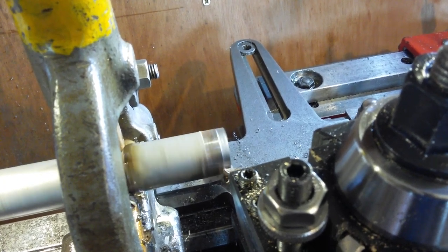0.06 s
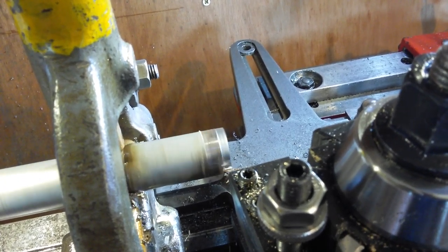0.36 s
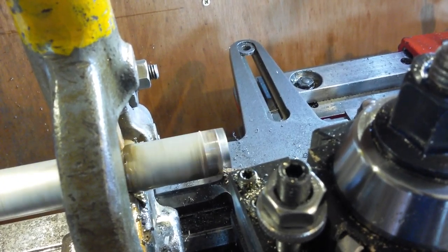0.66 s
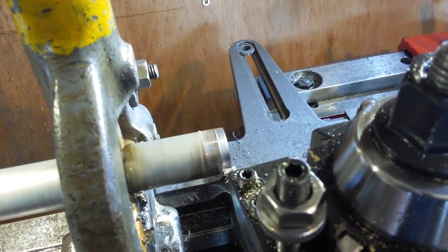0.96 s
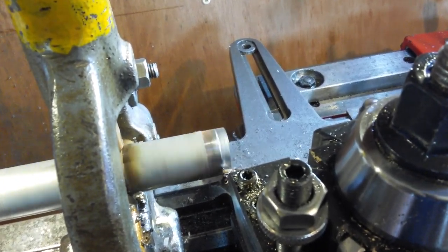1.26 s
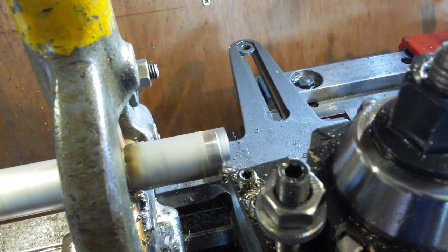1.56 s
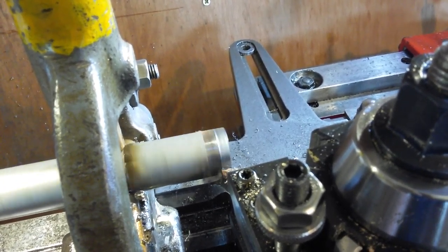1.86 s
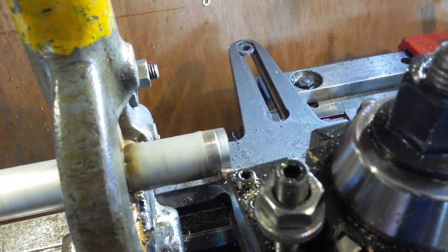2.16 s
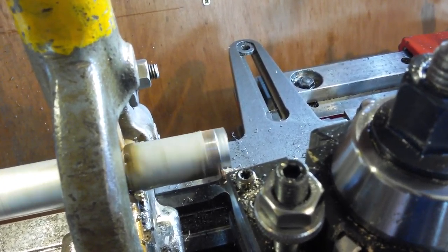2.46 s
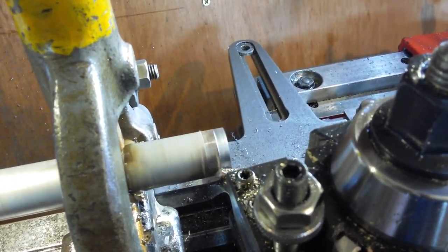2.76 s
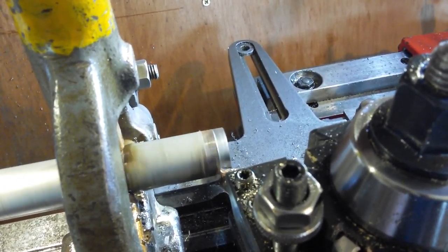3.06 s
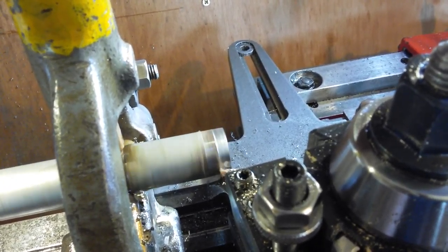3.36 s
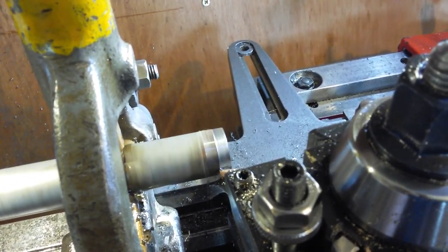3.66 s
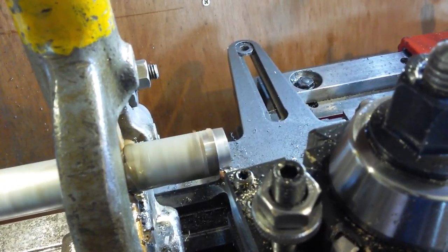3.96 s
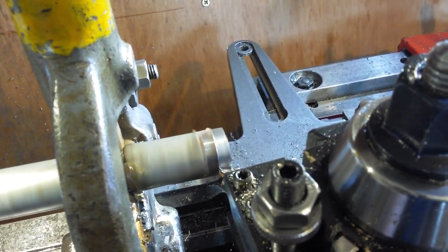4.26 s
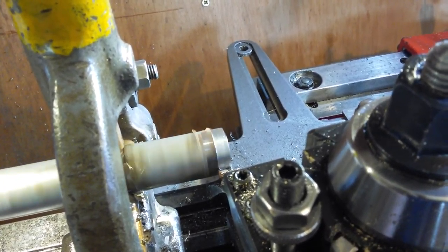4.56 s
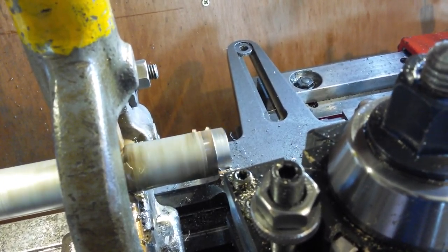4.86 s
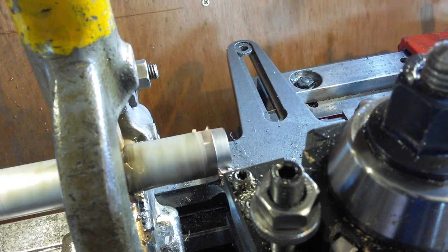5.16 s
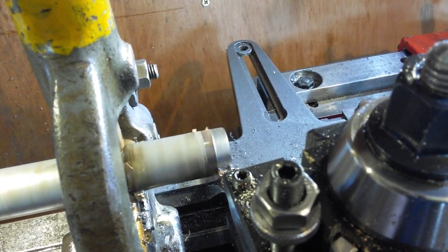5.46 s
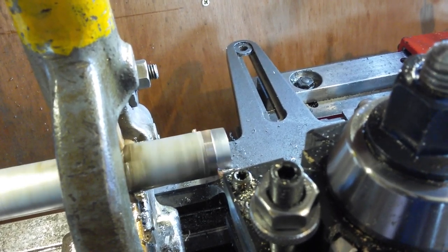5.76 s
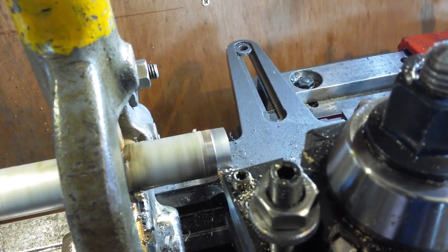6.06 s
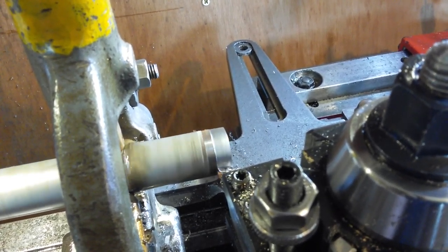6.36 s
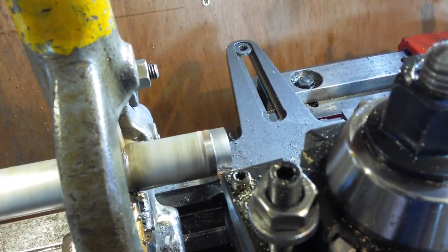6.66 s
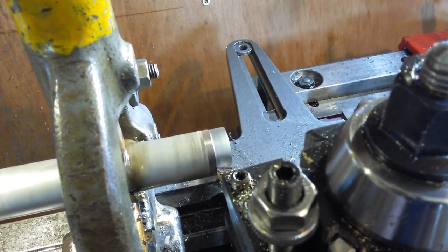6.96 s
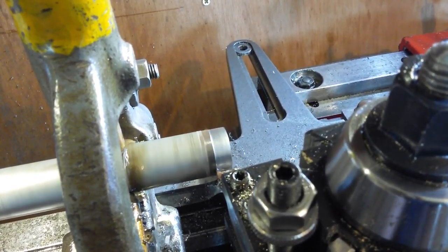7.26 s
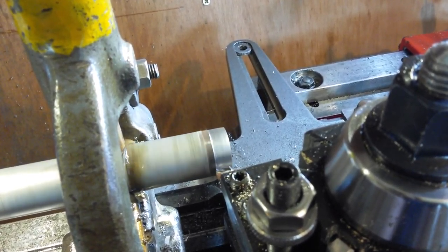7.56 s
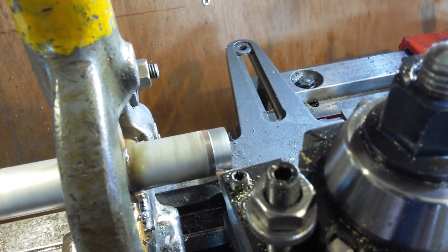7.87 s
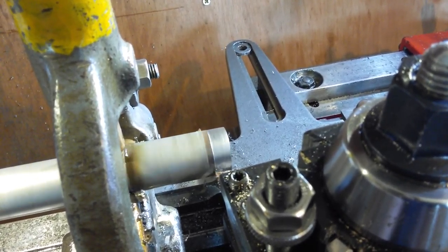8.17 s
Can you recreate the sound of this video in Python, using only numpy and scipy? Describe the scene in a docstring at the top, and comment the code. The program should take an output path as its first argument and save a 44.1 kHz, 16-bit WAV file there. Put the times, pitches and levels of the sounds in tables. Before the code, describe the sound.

A lathe tool squeals close by as it turns a metal tube in a small workshop. The high, wavering squeal comes in short bursts from start to finish, some mere chirps, stalling briefly as the tool digs in on each turn. The early digs add little low squawks. Chips scrape and crackle with the cut, while to the right a motor hums faintly, gears rattle and a belt slaps softly now and then.

```python
"""A lathe tool squeals near 2 kHz in bursts, close by, as it turns a metal tube in a home workshop.
The tool chatters at its own resonance and strikes the work each cycle, adding overtones.
Once a turn it digs in: the pitch sags, the squeal stalls, and deep digs squawk.
The chip scrapes and crackles; to the right the motor hums, gears rattle and a belt slaps."""
import sys
import numpy as np
from scipy import signal
from scipy.fft import rfft, irfft
from scipy.io import wavfile
from scipy.ndimage import uniform_filter1d

SR = 44100
rng = np.random.default_rng(int(sys.argv[2]) if len(sys.argv) > 2 else 0)


def output_pcm(signal):
    """Save a mono or channel-first signal as 16-bit PCM at the path in sys.argv[1].

    Samples are clipped to [-1, 1] before scaling.
    """
    pcm = np.clip(np.atleast_2d(signal).T, -1, 1) * 32767
    wavfile.write(sys.argv[1], SR, np.round(pcm).astype(np.int16))


N = 371763
T = np.arange(N) / SR
BINS_HZ = np.fft.rfftfreq(N, 1 / SR)


def undb(db):
    """Decibels to gain."""
    return 10 ** (np.asarray(db) / 20)


def unit(x):
    """Scale to rms 1."""
    return x / np.sqrt(np.mean(x ** 2))


def pan(db):
    """Stereo gains for a left-minus-right level."""
    return unit(undb(np.array([[db], [-db]]) / 2))


def curve(points):
    """Interpolate (time_s, value) rows at every sample."""
    return np.interp(T, *np.transpose(points))


def colour(x, points):
    """Filter by a smooth (freq_hz, gain_db) spectrum."""
    hz, db = np.transpose(points)
    return irfft(rfft(x) * undb(np.interp(np.log(BINS_HZ + 1), np.log(hz), db)), N)


def ring(x, modes):
    """Steep resonances, each four stages of the given width in series."""
    gain = sum(undb(db) / (1 + 1j * (BINS_HZ ** 2 - hz ** 2) / (2 * width_hz * (BINS_HZ + 1))) ** 4
               for hz, width_hz, db in modes)
    return irfft(rfft(x) * gain, N)


def walk(rate_hz):
    """Smooth random drift, rms 1."""
    step = max(int(SR / rate_hz), 1)
    held = np.repeat(rng.standard_normal(N // step + 1), step)
    return unit(uniform_filter1d(held, step)[:N])


# nearest reflection off the machine, left then right: delay_s, gain
BOUNCE = [(.00543, .4), (.00365, .6)]

def workshop(x, early_db, early_s, late_db, t60_s):
    """Direct sound, a bounce, dense echoes from the machine and a short room tail."""
    t = T[:SR // 2]
    out = []
    for side, (delay_s, gain) in zip(np.broadcast_to(x, (2, N)), BOUNCE):
        early, late = rng.standard_normal((2, len(t)))
        early = unit(early * np.exp(-t / early_s)) * undb(early_db)
        late = unit(late * undb(-60 * t / t60_s) * np.minimum(t / 0.011, 1)) * undb(late_db)
        response = (early + late) / np.sqrt(len(t))
        response[0] += 1
        response[int(delay_s * SR)] += gain
        out.append(unit(signal.fftconvolve(side, response)[:N]) * np.std(side))
    return np.array(out)


# spindle speed: time_s, turns_per_s
SPINDLE_SPEED = [(0, 6.61), (2.95, 6.585), (3.25, 6.25), (3.6, 6.53), (6.7, 6.52), (8.43, 6.66)]

def spindle(dig_at_s, lead_s, lag_s):
    """The tool digs in once a turn. Returns work angle, time since the dig and dig strength (0-1)."""
    speed = curve(SPINDLE_SPEED)
    turns = np.cumsum(speed) / SR
    turns -= np.interp(dig_at_s, T, turns)
    from_dig_s = (turns - np.round(turns)) / speed
    dig = np.exp(-(from_dig_s / np.where(from_dig_s < 0, lead_s, lag_s)) ** 2)
    return turns % 1, turns % 1 / speed, dig


# spells of chatter: start_s, end_s, force_db
SQUEALS = [(0, .19, -1), (.249, 0.499, 0), (0.541, 0.759, 1), (0.82, 1.052, -1), (1.174, 1.35, -1),
           (1.453, 1.741, 0), (1.801, 2.097, 1), (2.187, 2.344, -1), (2.464, 2.47, 1), (2.51, 2.617, 1),
           (2.641, 2.677, 1.5), (2.725, 2.735, -6.5), (2.783, 2.923, 0.5), (3.028, 3.075, -2),
           (3.094, 3.187, 2.5), (3.248, 3.35, -0.5), (3.386, 3.503, -3.5), (3.538, 3.546, 3),
           (3.687, 3.695, -0.5), (3.722, 3.877, 0.5), (3.99, 4.005, 0), (4.045, 4.138, 1.5),
           (4.174, 4.198, 3.5), (4.29, 4.436, 1.5), (4.546, 4.734, .5), (4.835, 4.989, 1),
           (5.037, 5.046, -5), (5.137, 5.295, 1), (5.343, 5.349, -8), (5.427, 5.603, 0), (5.731, 5.914, 0),
           (6.049, 6.264, 1), (6.309, 6.446, -.5), (6.624, 6.767, -0.5), (6.874, 6.877, -8),
           (6.906, 6.992, -0.5), (7.121, 7.14, -2), (7.162, 7.288, .5), (7.329, 7.335, -2),
           (7.389, 7.505, 0), (7.651, 7.654, -13), (7.688, 7.756, -1.5), (7.823, 7.842, -4.5),
           (7.897, 7.98, -0.5), (8.013, 8.279, -0.5), (8.331, 8.47, -.5)]
# pitch drop at the peak of a dig: time_s, sag_hz
DIG_SAG = [(0, 420), (2.8, 330), (4.5, 230), (8.4, 160)]
GRAB_DB, GRAB_S, BUILD_S = 2.2, 0.016, 0.1
STALL_S_PER_HZ, STALL_ONSET_HZ = 0.000102, 115

def bursts(level_db, since_dig_s, rise_s, fall_s, tail_db, tail_s, idle_db, flutter_db):
    """Squeal envelope: overshoots as the tool grabs, holds, rings out; a weak tremor in between."""
    envelope = np.zeros(N)
    for (start_s, end_s, _), db in zip(SQUEALS, level_db):
        span = slice(int(start_s * SR), int((end_s + 0.3) * SR))
        age_s, after_s = np.maximum(T[span] - start_s, 0), np.maximum(T[span] - end_s, 0)
        # longer squeals build up more ringing in the tube
        built_up = 1 - np.exp(-(end_s - start_s) / BUILD_S)
        tail = undb(tail_db) * built_up * np.exp(-after_s / tail_s)
        gate = np.minimum(age_s / rise_s, 1) * np.maximum(np.exp(-after_s / fall_s), tail)
        envelope[span] = np.maximum(envelope[span], gate * undb(db + GRAB_DB * np.exp(-age_s / GRAB_S)))
    # deeper digs stall the chatter for longer
    stall_s = STALL_S_PER_HZ * (curve(DIG_SAG) - STALL_ONSET_HZ)
    recovery = np.clip((since_dig_s - stall_s) / rise_s, 0, 1)
    envelope *= np.maximum(np.exp(-since_dig_s / fall_s), recovery)
    return np.maximum(envelope, undb(idle_db + flutter_db * walk(60)))


# partials 2 and up: left_db, right_db
OVERTONES = [(-3.5, -14), (-6.5, -1), (-12, -14), (-0.5, -14.5), (-8, -11.5), (-22.5, -20), (-31, -29)]
# radiation of tube and tool: freq_hz, gain_db
RADIATION = [(1000, -36), (1950, 0.5), (2800, -13), (3550, -4), (4200, 8.5), (4750, -16.5), (5350, -35),
             (6100, 16), (6650, -9), (8100, -2.5), (10100, -9), (12000, -3.5), (13000, -18), (14000, -7),
             (15000, -28)]
# tube's response to partial 3 as the tool travels: time_s, gain_db
THIRD_PARTIAL = [(0, -1.5), (1.7, 1), (3, 0), (5.5, -0.5), (6.9, -7), (8.4, -1)]
CHATTER_HZ, BRIGHT_DB_PER_HZ = 2025.6, 0.016
RUNOUT_HZ, RUNOUT_PEAK_TURNS, LOBE_HZ, LOBE_PEAK_TURNS = 23.76, 0.77, 31.1, 0.4016

def chatter(angle_turns, dig, swing, bite):
    """The tool swings at its resonance and strikes the work each cycle, which adds the overtones."""
    # the work runs off centre and is slightly three-lobed
    bend_hz = RUNOUT_HZ * np.cos(2 * np.pi * (angle_turns - RUNOUT_PEAK_TURNS))
    bend_hz += LOBE_HZ * np.cos(6 * np.pi * (angle_turns - LOBE_PEAK_TURNS))
    sag_hz = dig * curve(DIG_SAG)
    # chip load bends the pitch; tearing jostles it, most in a dig
    waver_hz = 14 * walk(30) + 21 * walk(80) + (9 * walk(300) + 11 * walk(1600)) * (1 + 2.5 * dig)
    phase = 2 * np.pi * np.cumsum(CHATTER_HZ + bend_hz - sag_hz + waver_hz) / SR
    # the cut grabs and slips
    throb = 1 + 0.29 * np.sin(2 * np.pi * np.cumsum(55 + 22 * walk(25)) / SR)
    stall_db = -0.04 * sag_hz
    tone = np.sqrt(2) * np.sin(phase) * swing * throb * undb(0.96 * walk(120) + stall_db + 1.44)
    strike = bite * undb(BRIGHT_DB_PER_HZ * bend_hz + 2.87 * walk(100) + stall_db / 2 - 4)
    overtones = 0
    for k, sides_db in enumerate(OVERTONES, 2):
        partial = np.sin(k * (phase + 0.065 * walk(900))) * undb(2.6 * walk(140))
        partial = unit(colour(partial, RADIATION))
        if k == 3:
            partial *= undb(curve(THIRD_PARTIAL))
        overtones += undb(sides_db)[:, None] * partial * strike
    return (workshop(tone * pan(13), early_db=0.5, early_s=0.0042, late_db=-9, t60_s=0.91)
            + workshop(overtones, early_db=2.5, early_s=0.0077, late_db=-5, t60_s=0.46))


# tube and tool holder modes: freq_hz, width_hz, gain_db
STEEL_MODES = [(1752, 76, 4.5), (2034, 117, 20), (5794, 233, 5.5), (7040, 130, -6)]

def chip(dig, bite):
    """Tiny fractures of the chip hiss and ring the steel, harder in each squeal and dig."""
    cracks = unit(rng.standard_normal((2, N)) * undb(3.5 * np.minimum(rng.exponential(size=N), 7)))
    force = bite * (1 + 2.6 * dig)
    scrape = unit(colour(cracks, RADIATION)) * pan(3.5) * (force + undb(-32))
    steel = unit(ring(cracks, STEEL_MODES)) * pan(7.2) * (force + undb(-19.5))
    return workshop((scrape + steel) * undb(-14.5), early_db=1, early_s=0.0019, late_db=-7.5, t60_s=0.37)


def stereo_noise(spread):
    """Common white noise plus an independent part per side."""
    return rng.standard_normal(N) + spread * rng.standard_normal((2, N))


# motor hum bands: freq_hz, width_hz, gain_db
HUM_BANDS = [(93.2, 6.2, 0), (108.3, 4.5, 0.5)]
# hum swells: time_s, gain_db
HUM_SWELLS = [(0.0, -52), (0.35, -42.5), (0.45, -53), (2.42, -43.5), (2.51, -60.5), (3.26, -45.5),
              (3.5, -62), (3.66, -44.5), (4.37, -47.5), (4.46, -34.5), (4.65, -51.5), (6.01, -45.5),
              (6.34, -55), (6.5, -44), (6.95, -57), (7.16, -47), (8.08, -44), (8.43, -55)]

def motor():
    """The motor hums in slow swells."""
    hum = ring(stereo_noise(spread=0.18), HUM_BANDS)
    running_rms = np.sqrt(uniform_filter1d(np.mean(hum ** 2, axis=0), SR // 4))
    return hum / running_rms * undb(curve(HUM_SWELLS) + 3) * pan(-34.5)


# gear housing modes: freq_hz, width_hz, gain_db
HOUSING_MODES = [(65.6, 21, -5.5), (164, 40, -11), (247, 45, -3.5), (316.1, 20.5, 5), (400, 51, -5.5),
                 (461.4, 22, 1.5), (501.8, 23.4, 5), (586, 55, 3.5), (643, 47, 2), (722.7, 32.5, -0.5),
                 (1122.6, 64, 2), (1185.5, 41, 4.5)]
# gear rattle: time_s, level_db
GEAR_LEVEL = [(0, -43), (2.7, -42), (4.4, -40), (5.4, -40.5), (6.6, -41.5), (8.4, -43.5)]

def gears():
    """The gears rattle their housing."""
    rattle = unit(ring(stereo_noise(spread=0.83), HOUSING_MODES))
    return rattle * undb(curve(GEAR_LEVEL) + 2 * walk(22)) * pan(-32)


# workshop air: freq_hz, gain_db
AIR_SPECTRUM = [(25, -13), (100, -1), (400, -3), (700, -4.5), (1050, -0.5), (1600, 0.5), (3000, -7),
                (5000, -18.5), (15000, -43)]

def air(level_db):
    """Steady, dull room noise."""
    return unit(colour(rng.standard_normal((2, N)), AIR_SPECTRUM)) * undb(level_db)


# tool holder mode: freq_hz, width_hz, gain_db
HOLDER_MODE = [(3526, 405, 0)]

def digs(since_dig_s, load, low_hz, dive_s, fade_s, squawk_db, ring_s, ring_db):
    """In a deep dig the vibration dives to a low squawk, and the struck tool holder rings on."""
    sag_hz = curve(DIG_SAG)
    pitch_hz = low_hz + (CHATTER_HZ - sag_hz - low_hz) * np.exp(-since_dig_s / dive_s)
    pitch_hz *= 1 + 0.17 * walk(600)
    depth = (sag_hz / sag_hz.max()) ** 3
    envelope = depth * np.minimum(since_dig_s / 0.00088, 1) * np.exp(-since_dig_s / fade_s)
    squawk = np.sin(2 * np.pi * np.cumsum(pitch_hz) / SR) * envelope * undb(squawk_db + 3.1 * walk(8))
    ring_envelope = signal.lfilter([1], [1, -np.exp(-1 / (ring_s * SR))], load)
    holder = unit(ring(rng.standard_normal(N), HOLDER_MODE) * ring_envelope) * undb(ring_db)
    return workshop((squawk + holder) * pan(7.9), early_db=2.5, early_s=0.003, late_db=-9, t60_s=1)


# belt slaps: start_s, gain_db
SLAPS = [(.05, -33.5), (.455, -38), (3.22, -38), (3.585, -35), (4.29, -32), (5.36, -31.5), (5.71, -36.5),
         (5.98, -33.5), (6.43, -35), (7.87, -39)]
# belt guard modes: freq_hz, gain_db, t60_s
GUARD_MODES = [(708, 6, 0.19), (598, -7, 0.25), (495, -2.5, 0.19), (325, -7, 0.25)]

def belt(rise_s):
    """Now and then the belt slaps softly and its guard rings."""
    out, t = np.zeros(N), T[:SR // 2]
    for start_s, slap_db in SLAPS:
        detunes = 1 + 0.0088 * rng.standard_normal(len(GUARD_MODES))
        knock = sum(np.sin(2 * np.pi * hz * detune * t) * undb(mode_db - 60 * t / t60_s)
                    for (hz, mode_db, t60_s), detune in zip(GUARD_MODES, detunes))
        first = int(start_s * SR)
        out[first:first + len(t)] += (knock * np.minimum(t / rise_s, 1) * undb(slap_db))[:N - first]
    return out * pan(-29)


def scene():
    """Chatter, chip and digs over the drive and the air of the shop."""
    angle_turns, since_dig_s, dig = spindle(dig_at_s=0.156, lead_s=0.0055, lag_s=0.007)
    force_db = np.array(SQUEALS)[:, 2]
    # the tool's swing barely varies with force; its bite on the work follows it
    swing = bursts(-19 + 0.17 * force_db, since_dig_s, rise_s=0.006, fall_s=0.013,
                   tail_db=-12, tail_s=0.043, idle_db=-35, flutter_db=4)
    bite = bursts(-16 + force_db, since_dig_s, rise_s=0.0038, fall_s=0.0075,
                  tail_db=-8, tail_s=0.051, idle_db=-56, flutter_db=8)
    room = air(level_db=-45)
    squawks = digs(since_dig_s, dig * bite, low_hz=651, dive_s=0.011, fade_s=0.012,
                   squawk_db=-29, ring_s=0.033, ring_db=-43)
    cutting = chatter(angle_turns, dig, swing, bite) + chip(dig, bite) + squawks
    return cutting + motor() + gears() + room + belt(rise_s=0.013)


def record(dry):
    """The recorder rounds the highest peaks and cuts the top."""
    rounded = dry / (1 + dry ** 4) ** (1 / 4)
    cutoff_hz = 15850
    return signal.sosfilt(signal.ellip(10, 0.2, 80, cutoff_hz, fs=SR, output="sos"), rounded)


dry = scene()
out = record(dry)
output_pcm(out)
```